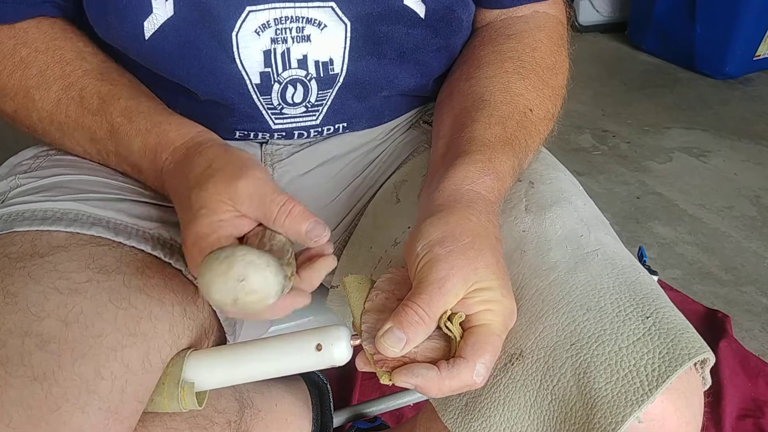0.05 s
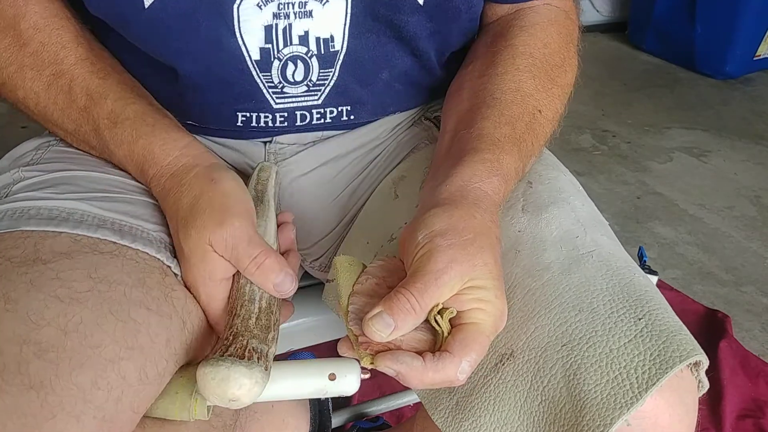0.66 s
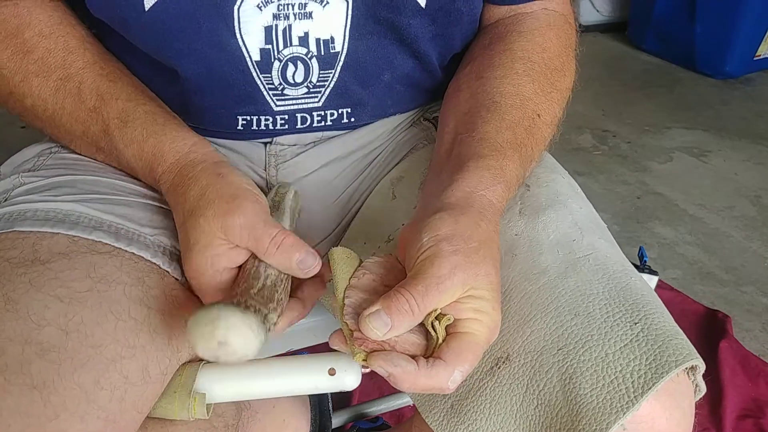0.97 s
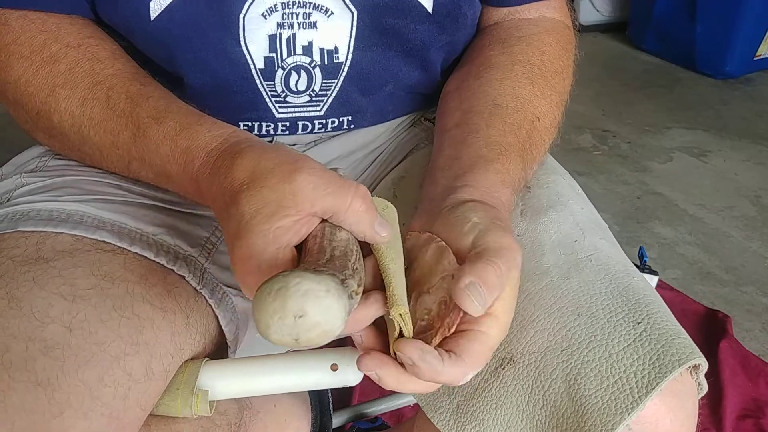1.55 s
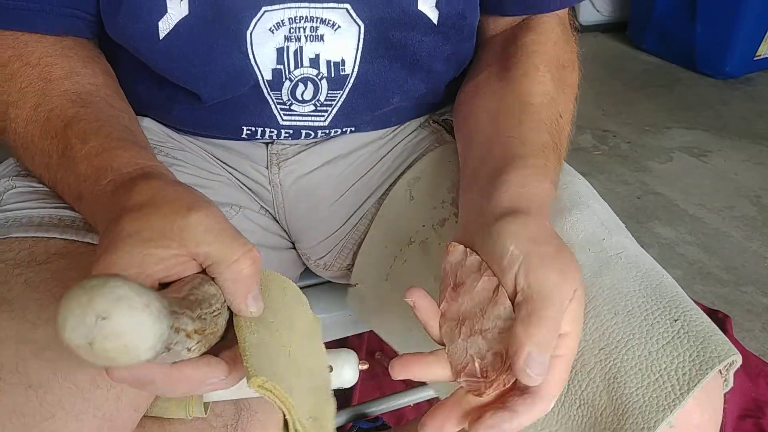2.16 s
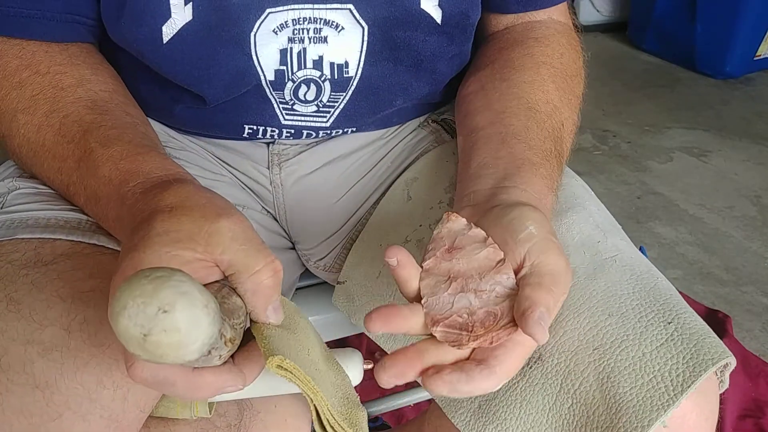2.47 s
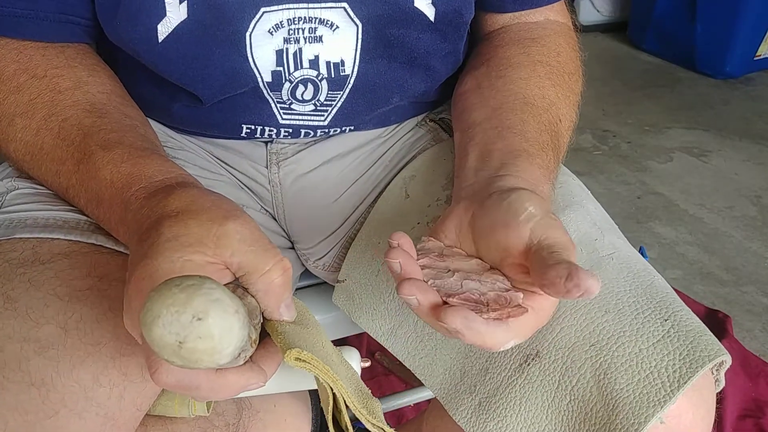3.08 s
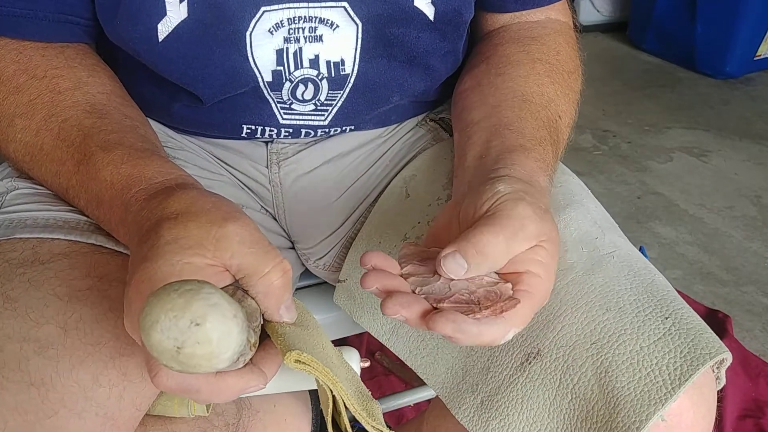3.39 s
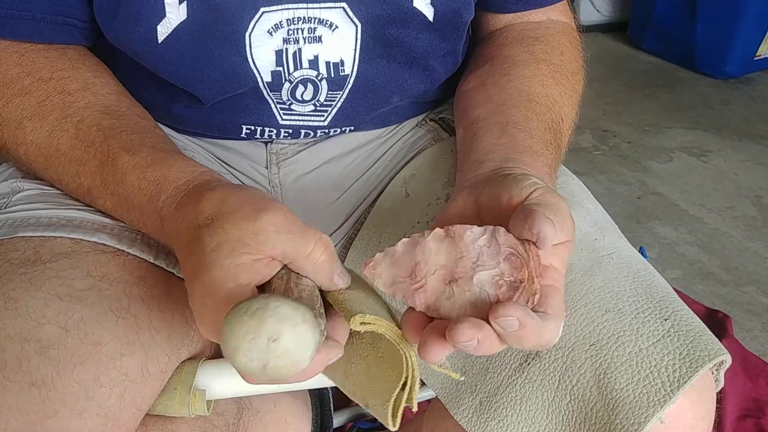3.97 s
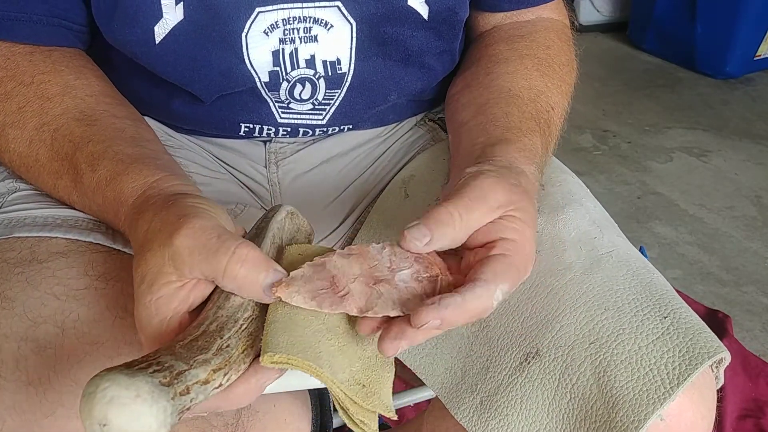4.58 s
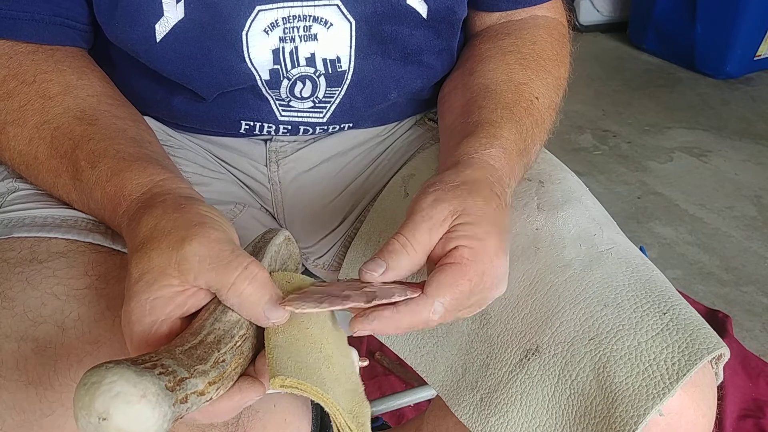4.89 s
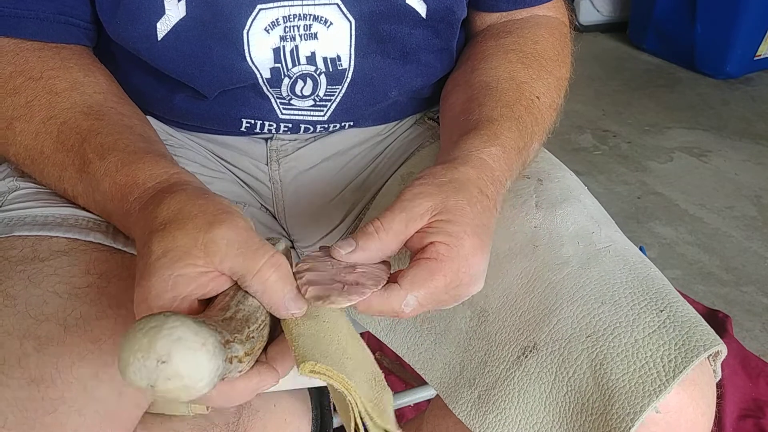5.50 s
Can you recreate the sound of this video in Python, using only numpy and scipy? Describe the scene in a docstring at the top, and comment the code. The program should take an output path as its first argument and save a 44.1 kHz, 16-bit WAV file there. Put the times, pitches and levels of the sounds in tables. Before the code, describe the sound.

A single hard crack with a dull knock sounds near the microphone as antler strikes a flake off a stone, with a short garage echo. Leather and skin brush the stone, grit snaps, and loose flakes clink against the blade like glass about halfway through. Quiet rubbing continues. Behind it all are a far engine hum, rumbling traffic, small bird calls and faint buzzing insects.

```python
"""A distant engine hums outside an open garage, with traffic rumble, faint birds and, later, buzzing insects.
Close by, an antler billet knocks a flake off a stone blade, and the hard walls throw the crack back.
The blade is unwrapped from its leather pad: fingers and leather rub the stone, grit snaps,
and loose flakes and the blade touch and ring like glass."""
import sys
import numpy as np
from scipy import signal
from scipy.fft import rfft, irfft
from scipy.io import wavfile

SR = 44100
rng = np.random.default_rng(int(sys.argv[2]) if len(sys.argv) > 2 else 0)


def wav_record(signal):
    """Record a signal, one row per channel, as 16-bit PCM in the file named by sys.argv[1]."""
    frames = np.transpose(np.atleast_2d(signal))
    bounded = np.clip(frames, -1, 1)
    # unit amplitude maps onto the largest positive 16-bit level
    quanta = np.round(bounded * 32767).astype(np.int16)
    wavfile.write(sys.argv[1], SR, quanta)


N = 249165
T = np.arange(N) / SR


def amp(db):
    """Decibels to gain."""
    return 10 ** (np.asarray(db) / 20)


def unit_rms(x):
    """Scales to rms 1."""
    return x / np.sqrt(np.mean(x ** 2) + 1e-20)


def at_hz(table, hz):
    """A table's value, interpolated on a log-frequency axis."""
    table_hz, value = np.transpose(table)
    return np.interp(np.log(hz + 1), np.log(table_hz + 1), value)


def add(mix, start_s, sound):
    """Mixes a sound in at start_s."""
    part = mix[round(start_s * SR):][:len(sound)]
    part += sound[:len(part)]


def swell(middle_s, length_s):
    """A bell-shaped rise and fall of height 1."""
    return np.exp(-(2 * (T - middle_s) / length_s) ** 2)


def noise(shape_db):
    """Noise of rms 1, its spectrum given as a function of frequency."""
    gain = amp(shape_db(np.fft.rfftfreq(N, 1 / SR)))
    return unit_rms(irfft(rfft(rng.standard_normal(N)) * gain, N))


def band(centre_hz, width_hz):
    """A narrow band of noise; around 0 Hz, a random drift."""
    return noise(lambda hz: -20 * np.log10(1 + (2 * (hz - centre_hz) / width_hz) ** 4))


def colour(x, spectrum, modes=(), size=4096):
    """Minimum-phase filter of unit energy: a broad spectrum lifted at its resonances."""
    hz = abs(np.fft.fftfreq(size, 1 / SR))
    peaks_db = sum(lift_db / (1 + (2 * (hz - mode_hz) / width_hz) ** 2)
                   for mode_hz, width_hz, lift_db in modes)
    log_gain = np.log(amp(np.maximum(at_hz(spectrum, hz) + peaks_db, -100)))
    pulse = np.fft.ifft(np.exp(np.conj(signal.hilbert(log_gain)))).real[:size // 2]
    return signal.oaconvolve(x, pulse / np.linalg.norm(pulse))[:N]


def burst(t60_s, size=4096):
    """A dying cluster of tiny fractures, of unit energy."""
    x = rng.choice([-1., 1.], size) * amp(-60 * T[:size] / t60_s)
    return x / np.linalg.norm(x)


def ringing(modes, t):
    """A struck body's modes, each a decaying sine."""
    return sum(amp(db - 60 * t / t60_s) * np.sin(2 * np.pi * hz * t) for hz, db, t60_s in modes)


def chirp(pitch_hz, warble_share):
    """A soft-edged tone that warbles around a pitch curve."""
    hz = pitch_hz * (1 + warble_share * band(0, 500)[:len(pitch_hz)])
    return signal.windows.tukey(len(hz), .5) * np.sqrt(2) * np.sin(2 * np.pi * np.cumsum(hz) / SR)


def reflected(x, room):
    """The sound as the walls return it."""
    return signal.fftconvolve(x, room)[:N]


# reverberation time: frequency_hz, t60_s
ROOM_DECAY = [(150, .35), (500, 0.33), (1000, 0.36), (2000, 0.46), (5000, 0.44), (8000, 0.43), (12000, .38),
              (16000, 0.41)]
# near walls: delay_s, gain
WALL_ECHOES = [(.0088, .13), (0.0098, .12), (0.0141, .14), (0.0162, 0.11), (.0215, .15), (0.0361, .15)]


def garage(build_s=0.012, onset_s=0.00422):
    """Impulse response: a few near walls, and a dense tail that builds up and dies band by band."""
    hz, frame_s, spectra = signal.stft(rng.standard_normal(SR), SR, nperseg=256)
    decay = amp(-60 * frame_s / at_hz(ROOM_DECAY, hz)[:, None])
    build = 1 - np.exp(-np.maximum(T[:SR] - onset_s, 0) / build_s)
    response = signal.istft(spectra * decay, SR, nperseg=256)[1][:SR] * build
    response /= np.linalg.norm(response)
    for delay_s, gain in WALL_ECHOES:
        add(response, delay_s, np.array([gain]))
    return response / np.linalg.norm(response)


# outdoor noise: frequency_hz, relative_density_db
AIR_SPECTRUM = [(20, -42.5), (55, -1.5), (100, -1), (168, -7), (204, -10), (320, -19.5), (420, -17),
                (520, -23.5), (1050, -26), (2500, -33), (5500, -38.5), (8000, -28), (10800, -41),
                (16000, -40)]


def air(level_db=-48.5, wander_db=-1.0):
    """Far traffic rumble and the hiss of a summer day."""
    return amp(level_db + wander_db * band(0, 4.7)) * noise(lambda hz: at_hz(AIR_SPECTRUM, hz))


def tyres(level_db=-70, middle_s=5.27, length_s=0.99):
    """The faint tyre hiss of one far car rises and falls."""
    return amp(level_db) * swell(middle_s, length_s) * band(centre_hz=1080, width_hz=422)


# engine speed: time_s, firing_hz
FIRING_RATE = [(0, 100.6), (1.1, 100.1), (1.9, 98.8), (5.65, 99.3)]
# partials of the hum: firing_multiple, relative_db
ENGINE_ORDERS = [(1, -2.5), (1.5, -15), (2, -23), (3, -29.5), (3.5, -25.5)]
# returns of the hum: middle_s, length_s, level_db
ENGINE_SWELLS = [(4.142, 0.46, -47), (5.05, 0.66, -53)]


def engine(level_db=-40.5, sag_db_per_s=1.26, fade_start_s=2.994, fade_db_per_s=48.5, waver_share=0.038):
    """A far engine: the firing tone and weaker orders waver, hold, fade and swell back."""
    firings = np.cumsum(np.interp(T, *np.transpose(FIRING_RATE))) / SR
    hum = np.zeros(N)
    for order, db in ENGINE_ORDERS:
        waver = 1 + waver_share * band(0, 12)
        hum += amp(db) * waver * np.sin(2 * np.pi * (order * firings + rng.random()))
    held = amp(level_db - sag_db_per_s * T - fade_db_per_s * np.maximum(T - fade_start_s, 0))
    swells = sum(amp(db) * swell(middle_s, length_s) for middle_s, length_s, db in ENGINE_SWELLS)
    return (held + swells) * unit_rms(hum)


def rasping_insect(level_db=-66, lower_db=-3, flutter_db=3, first_peak_s=.08, pulses_per_s=4.93):
    """A far insect rasps in soft, even pulses that arch in pitch, with a weaker band just below."""
    top_hz, arch_hz, width_hz, lower_offset_hz = 9880, 450, 450, 700
    pulses = abs(np.cos(np.pi * pulses_per_s * (T - first_peak_s)))
    pitch_hz = top_hz - arch_hz * (1 - pulses ** 2) ** 2
    upper, lower = (unit_rms(band(0, width_hz) * np.sin(2 * np.pi * np.cumsum(hz) / SR))
                    for hz in (pitch_hz, pitch_hz - lower_offset_hz))
    return amp(level_db + flutter_db * band(0, 20)) * pulses * (upper + amp(lower_db) * lower)


# buzzers by name: pitch_hz, idle_relative_db
INSECTS = {"low": (5260, -69), "middle": (8510, -66), "high": (11900, -74)}
# louder buzzes: middle_s, insect, relative_db
BUZZ_SPURTS = [(1.32, "low", -58), (1.43, "middle", -60), (1.70, "low", -61), (3.0, "low", -61),
               (3.99, "middle", -54.5), (4.16, "low", -55), (4.96, "low", -63), (5.285, "middle", -49),
               (5.47, "middle", -57)]


def buzzing_insects(room, start_s=1.2, spurt_s=0.088, ragged_db=5, direct_db=-3, room_db=-9):
    """Three insects buzz on and off at random, now and then in a louder spurt."""
    x = np.zeros(N)
    for name, (pitch_hz, idle_db) in INSECTS.items():
        idle = amp(idle_db) * (T > start_s) * unit_rms(np.clip(band(0, 16), 0, 1))
        spurts = sum(amp(db) * swell(middle_s, spurt_s)
                     for middle_s, insect, db in BUZZ_SPURTS if insect == name)
        buzz = unit_rms(band(pitch_hz, 180) * amp(ragged_db * band(0, 70)))
        x += (idle + spurts) * buzz
    return amp(direct_db) * x + amp(room_db) * reflected(x, room)


def whistle(length_s=0.42, start_hz=5600, target_hz=8450, rise_s=.065, sag_hz_per_s=2000):
    """A bird's long, thin whistle climbs quickly, then sags."""
    t = T[:round(length_s * SR)]
    pitch_hz = target_hz + (start_hz - target_hz) * np.exp(-t / rise_s) - sag_hz_per_s * t
    return chirp(pitch_hz, warble_share=0.0083)


# short calls: start_s, length_s, start_hz, end_hz, relative_db
BIRD_SLURS = [(0.06, 0.062, 4500, 3700, -60), (0.246, 0.075, 3690, 4020, -60), (0.44, .09, 4300, 4853, -62),
              (1.16, 0.032, 3430, 3810, -53), (1.46, 0.07, 3600, 2670, -63), (2.05, 0.092, 3400, 2554, -59),
              (2.374, 0.063, 3900, 2626, -50), (2.754, 0.05, 4160, 3180, -52),
              (2.903, .16, 2956, 2530, -63.5), (3.12, 0.19, 3730, 3140, -60),
              (3.484, 0.14, 4620, 3490, -58.5)]


def birds(room, bend_power=1.8, whistle_start_s=4.38, whistle_relative_db=-50.5, direct_db=-5, room_db=-5):
    """Far birds: warbling slurs that glide fast and level off, and one high whistle."""
    x = np.zeros(N)
    for start_s, length_s, start_hz, end_hz, db in BIRD_SLURS:
        remaining = np.linspace(1, 0, round(length_s * SR))
        pitch_hz = end_hz + (start_hz - end_hz) * remaining ** bend_power
        add(x, start_s, amp(db) * chirp(pitch_hz, warble_share=0.039))
    add(x, whistle_start_s, amp(whistle_relative_db) * whistle())
    return amp(direct_db) * x + amp(room_db) * reflected(x, room)


# grit on stone: frequency_hz, relative_density_db
GRIT_SPECTRUM = [(300, -17), (1500, -14.5), (3500, -11), (7500, -0.5), (10000, -9), (15500, -12.5)]


def gritty(x, tilt_db_per_octave):
    """The colour of grit on stone, tilted brighter or duller."""
    top_hz = GRIT_SPECTRUM[-1][0]
    return colour(x, [(hz, db + tilt_db_per_octave * np.log2(hz / top_hz)) for hz, db in GRIT_SPECTRUM])


# skin and leather rubbing stone: middle_s, length_s, level_db, tilt_db_per_octave
RUB_STROKES = [(1.05, 0.28, -56, -1.5), (1.324, 0.27, -55.5, -2.5), (1.697, 0.092, -53, -3),
               (2.049, 0.1, -53, -0.5), (2.142, 0.065, -48, -1), (2.322, 0.071, -47, -0.5),
               (2.926, 0.043, -42, 3), (2.988, 0.045, -50.5, 2.5), (3.471, 0.027, -42.5, 3),
               (4.13, .08, -56.5, -3), (4.919, .2, -59.5, 0.5), (5.385, 0.24, -65, 3)]
# grit and leather snapping and bumping, and at 2.594 s a tiny sliver of stone clinking: start_s, energy_db,
# t60_s, tilt_db_per_octave
GRIT_TICKS = [(0.9258, -15, 0.059, -2), (1.0068, -12.5, .003, -0.5), (1.1524, -17.5, 0.0022, 4),
              (1.215, -26, .015, 0), (1.375, -23, 0.0071, 2), (2.594, -27, .015, 12),
              (2.627, -17, 0.034, -8.5), (3.9344, -30.5, .02, -0.5), (4.993, -26.5, .02, 1.5)]


def handling(room, grip_db=-68.5, grip_wander_db=2.5, grain_db=3, room_db=-7):
    """The holding hand rustles faintly; skin and leather stroke the stone, and grit snaps."""
    grains = unit_rms(rng.standard_normal(N) * amp(grain_db * band(0, 500)))
    x = gritty(amp(grip_db + grip_wander_db * band(0, 5.6)) * grains, 0)
    for middle_s, length_s, db, tilt in RUB_STROKES:
        x += gritty(amp(db) * swell(middle_s, length_s) * grains, tilt)
    for start_s, db, t60_s, tilt in GRIT_TICKS:
        add(x, start_s, amp(db) * gritty(burst(t60_s), tilt))
    return x + amp(room_db) * reflected(x, room)


# free modes of each piece of stone: pitch_hz, relative_db, t60_s
BLADE = [(4305, -20, .2), (8237, 0, .2), (9830, -6, .065), (13680, 8, .045)]
FLAKE = [(6258, 0, .065), (10305, -7, .04), (14700, 3, .035)]
SLIVER = [(7258, 0, .075), (9319, -2, .085), (15650, -7, .03)]
CHIP = [(14550, 0, .025)]
SPALL = [(5520, 0, .07), (6480, -1, .05), (7450, 1, .05)]
# modes by piece name
PIECES = {"blade": BLADE, "flake": FLAKE, "sliver": SLIVER, "chip": CHIP, "spall": SPALL}
# contact click: frequency_hz, relative_density_db
CLICK_SPECTRUM = [(200, -29), (1000, -22), (2200, -26), (4000, -1.5), (5800, -18), (7500, 1), (8700, 7.5),
                  (11500, -1.5), (16000, 2)]
# stone on stone, partly shielded by the hand: start_s, piece, ring_db, click_db, highpass_hz, send_db
STONE_CONTACTS = [(0.925, "spall", -43, -35, 3000, -8), (1.0072, "chip", -18, -20, 4000, -4.5),
                  (2.4087, "sliver", -27.5, -39, 7000, -3.5), (2.4367, "flake", -16.5, -8, 5990, -6.5),
                  (2.5298, "sliver", -49, -21, 6500, 2), (2.6223, "blade", -12, 8, 250, -4.5),
                  (2.6322, "blade", -68, 9.5, 5500, -8)]


def clinks(room, contact_t60_s=0.0059, attack_s=.0004, ring_room_db=-8, click_room_db=-2):
    """Each contact clicks and sets one piece ringing; a light piece clicks only in the treble."""
    x, t = np.zeros(N), T[:SR // 2]
    attack = np.sin(np.pi / 2 * np.minimum(t / attack_s, 1)) ** 2
    for start_s, piece, ring_db, click_db, highpass_hz, send_db in STONE_CONTACTS:
        ring = amp(ring_db) * ringing(PIECES[piece], t) * attack
        click = amp(click_db) * colour(burst(contact_t60_s, size=len(t)), CLICK_SPECTRUM)[:len(t)]
        click = signal.sosfilt(signal.butter(3, highpass_hz, "high", fs=SR, output="sos"), click)
        to_walls = amp(ring_room_db) * ring + amp(click_room_db) * click
        add(x, start_s, ring + click)
        add(x, start_s, amp(send_db) * reflected(to_walls, room))
    return x


# billet on padded stone: pitch_hz, level_db, t60_s
KNOCK_MODES = [(55, -30, 0.11), (199, -49, 0.028), (391, -33, 0.12), (802, -22, 0.064)]


def knock(start_s):
    """The blow shoves stone, pad and thigh: low, quickly damped modes."""
    x = np.zeros(N)
    add(x, start_s, ringing(KNOCK_MODES, T[:SR // 2]))
    return x


# fracture: frequency_hz, relative_density_db
CRACK_SPECTRUM = [(60, -19), (200, -24), (380, -18), (640, -19), (850, -15), (1500, -7), (1900, -4.5),
                  (2800, -7), (6600, -3.5), (7400, 0), (8700, -4), (10300, -18.5), (13000, -24.5),
                  (16000, -30)]
# resonances of antler and gripped stone: centre_hz, width_hz, lift_db
BLOW_MODES = [(1010, 70, 8.5), (1170, 73, 7), (1881, 130, 7), (2290, 330, 7), (3140, 190, 5.5),
              (3870, 170, 6), (4660, 240, 4), (5850, 220, 4), (7184, 380, 4.5), (8200, 440, 4),
              (11400, 460, 5.5)]


def crack(room, start_s, t60_s=0.036, direct_db=20, room_db=25.5):
    """The flake splits off within milliseconds; most of the sound comes back from the walls."""
    x = np.zeros(N)
    add(x, start_s, amp(direct_db) * burst(t60_s))
    add(x, start_s, amp(room_db) * room)
    return colour(x, CRACK_SPECTRUM, BLOW_MODES)


def scene(blow_s=0.5615):
    """The knapper close by, the outdoors behind; mono."""
    room = garage()
    knapper = crack(room, blow_s) + knock(blow_s) + clinks(room) + handling(room)
    outdoors = engine() + buzzing_insects(room) + rasping_insect() + birds(room) + air() + tyres()
    return (knapper + outdoors)[None]


def record(dry, ceiling=1.4, cutoff_hz=15850):
    """The crack overloads the microphone softly; a steep low-pass follows."""
    saturated = ceiling * np.tanh(dry / ceiling)
    lowpass = signal.firwin(401, cutoff_hz, window=("kaiser", 9), fs=SR)
    return signal.oaconvolve(saturated, lowpass[None], "same")


dry = scene()
out = record(dry)
wav_record(out)
```